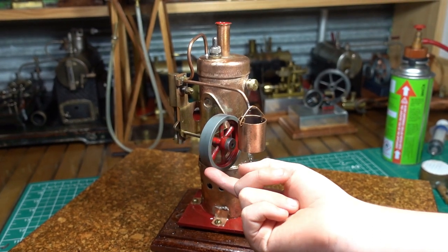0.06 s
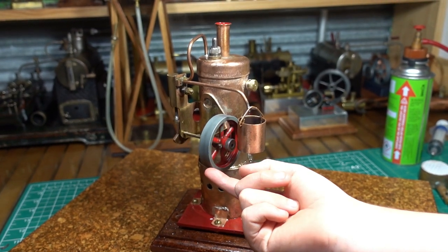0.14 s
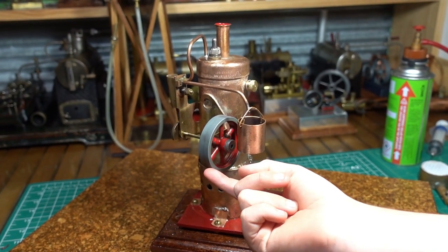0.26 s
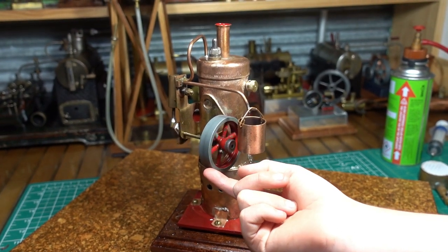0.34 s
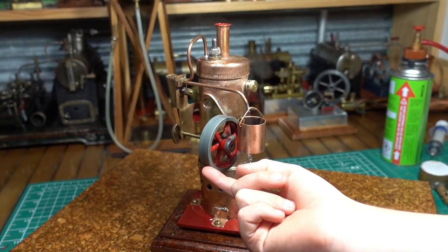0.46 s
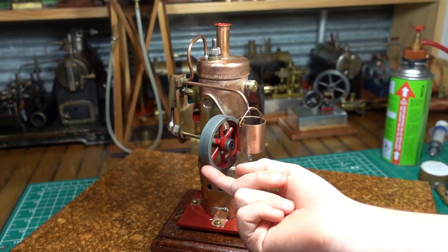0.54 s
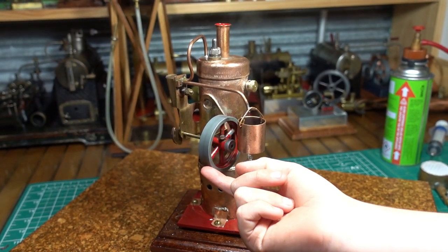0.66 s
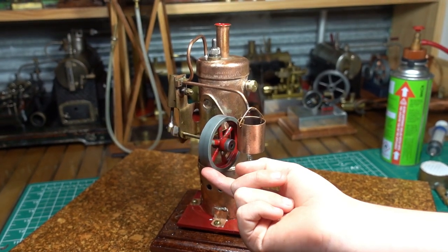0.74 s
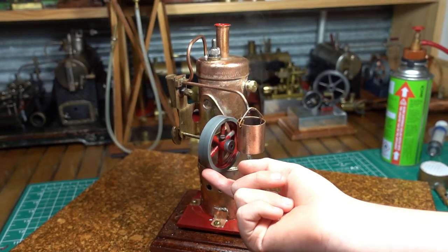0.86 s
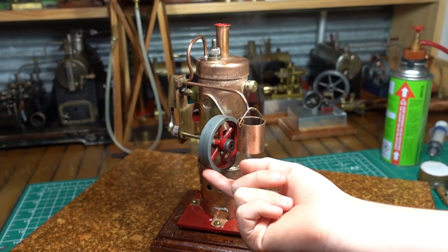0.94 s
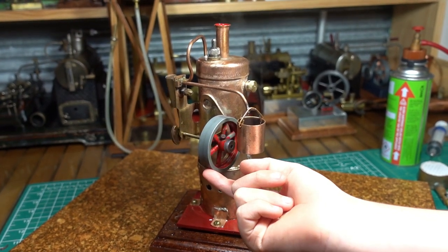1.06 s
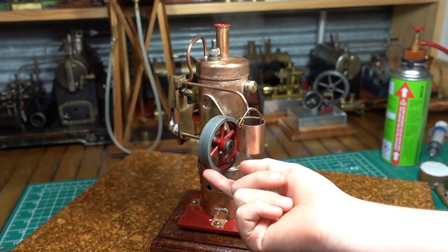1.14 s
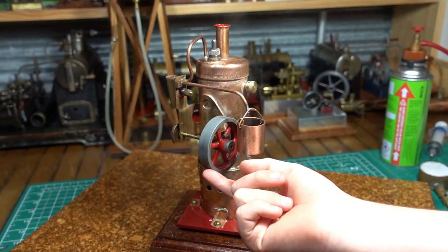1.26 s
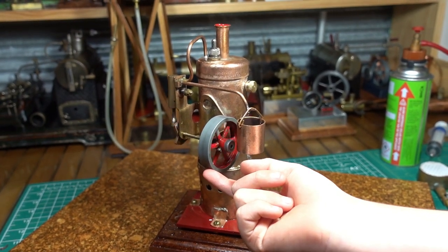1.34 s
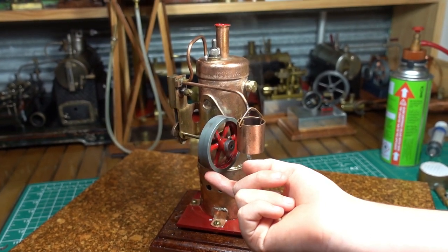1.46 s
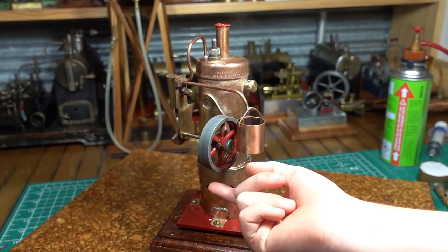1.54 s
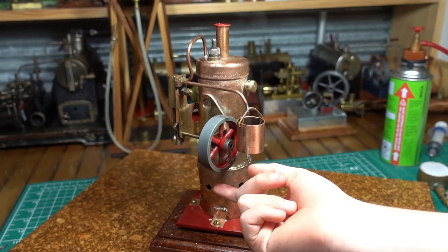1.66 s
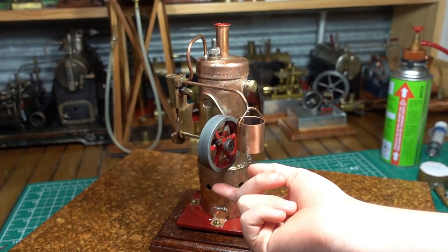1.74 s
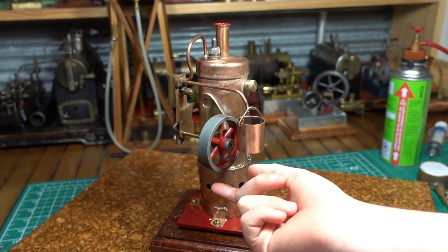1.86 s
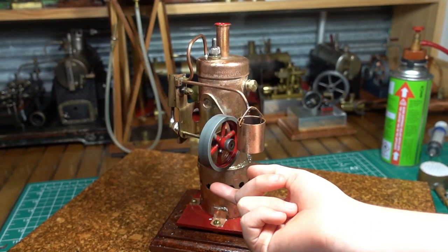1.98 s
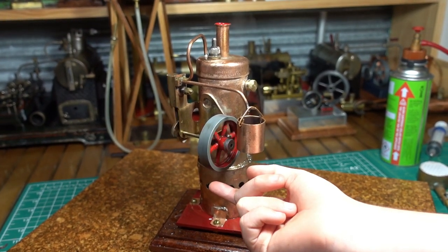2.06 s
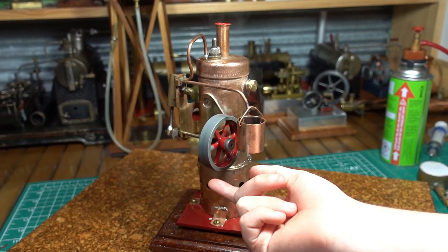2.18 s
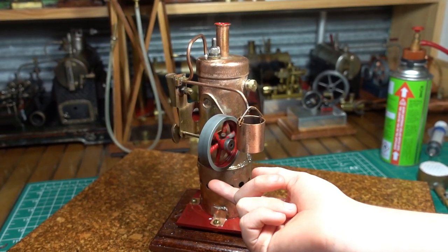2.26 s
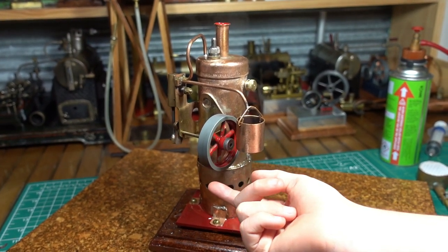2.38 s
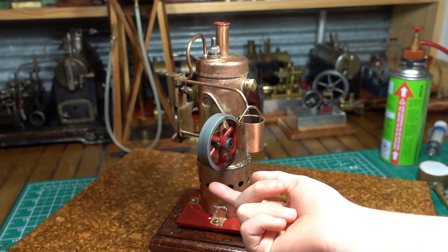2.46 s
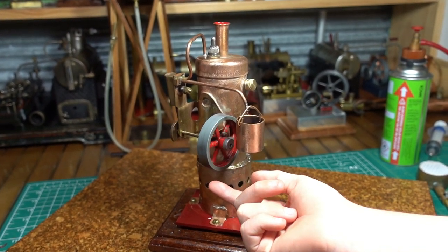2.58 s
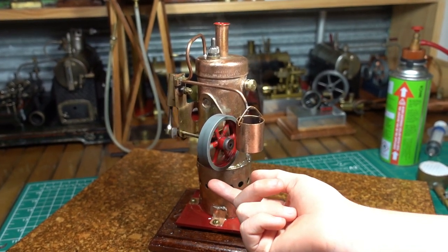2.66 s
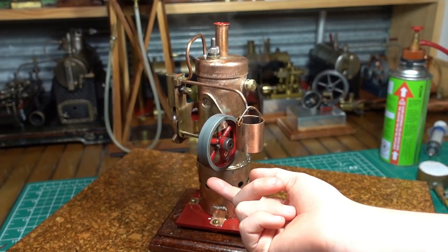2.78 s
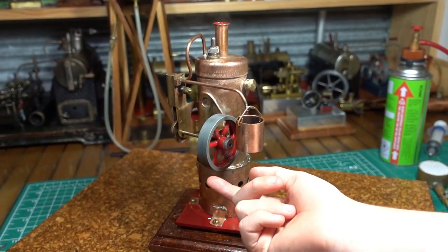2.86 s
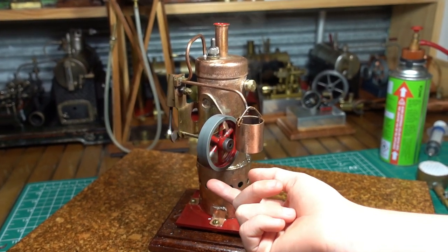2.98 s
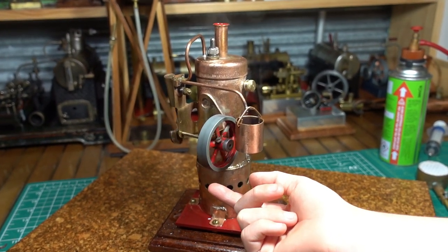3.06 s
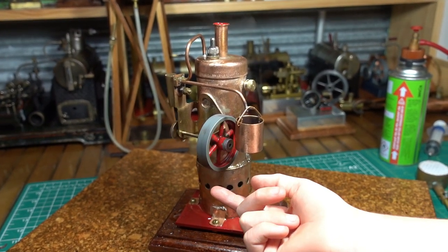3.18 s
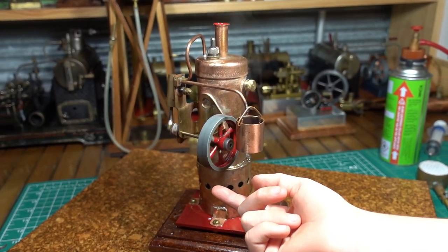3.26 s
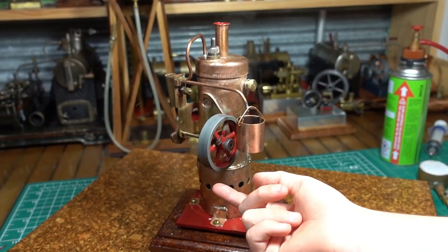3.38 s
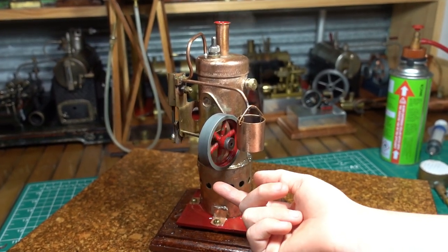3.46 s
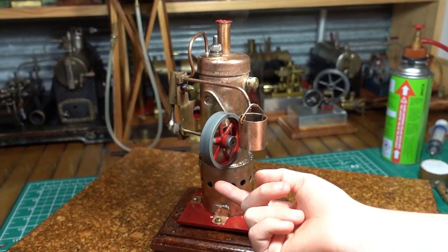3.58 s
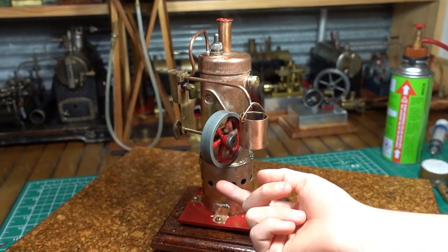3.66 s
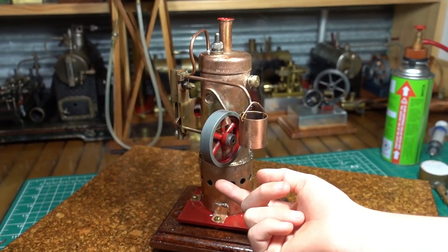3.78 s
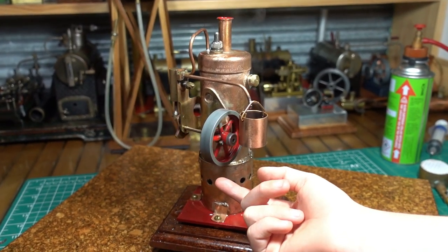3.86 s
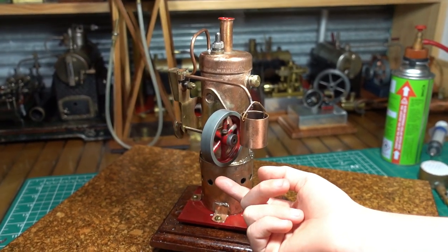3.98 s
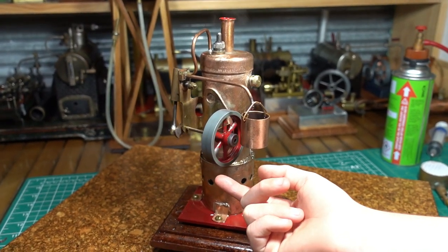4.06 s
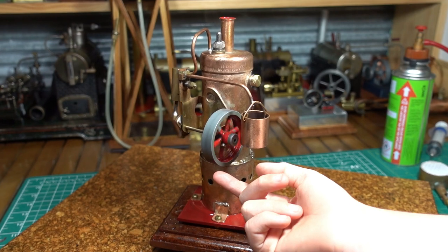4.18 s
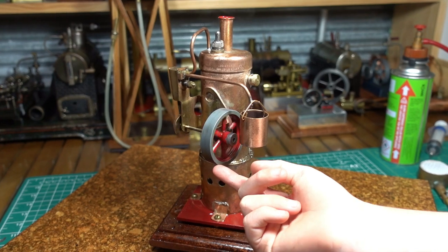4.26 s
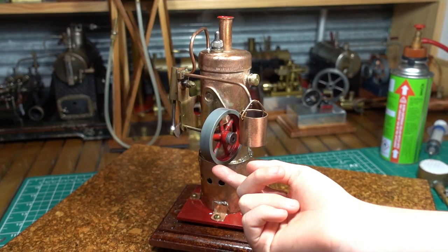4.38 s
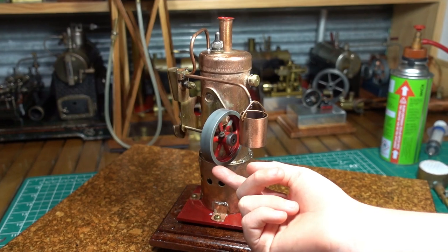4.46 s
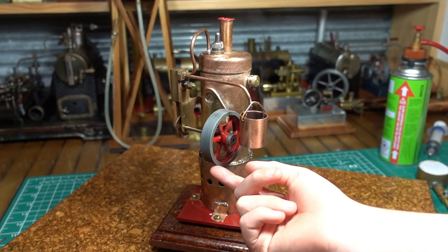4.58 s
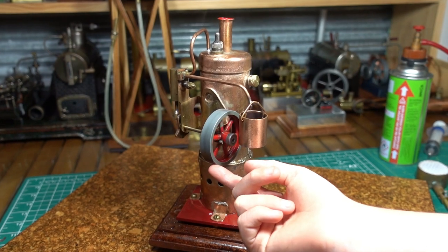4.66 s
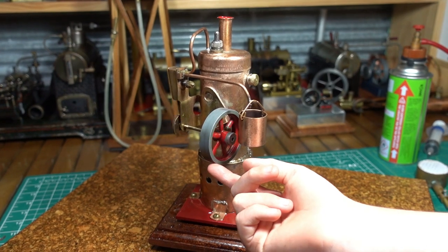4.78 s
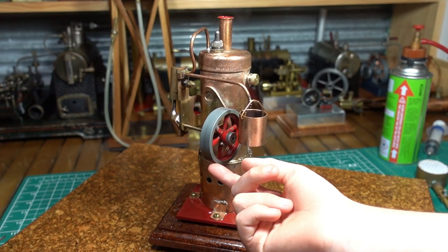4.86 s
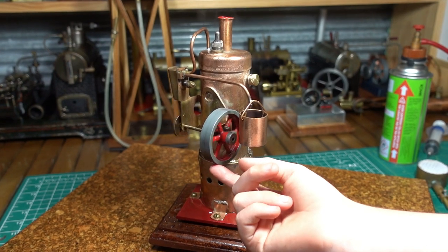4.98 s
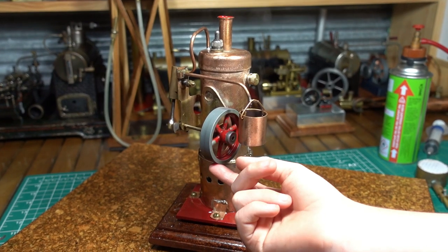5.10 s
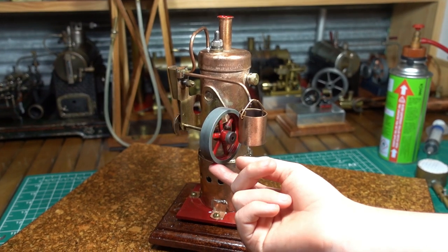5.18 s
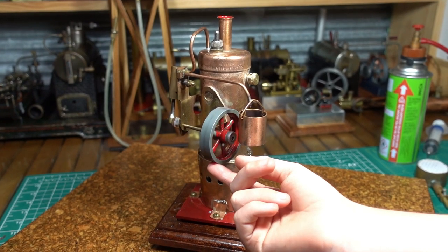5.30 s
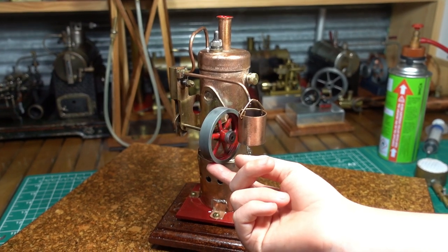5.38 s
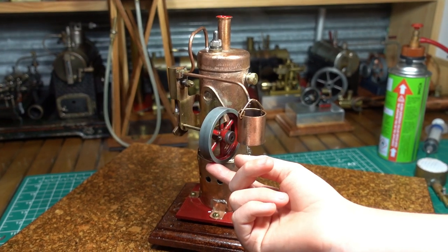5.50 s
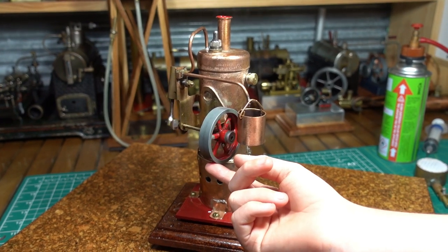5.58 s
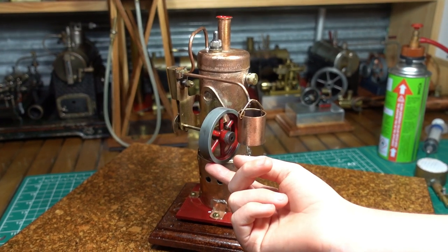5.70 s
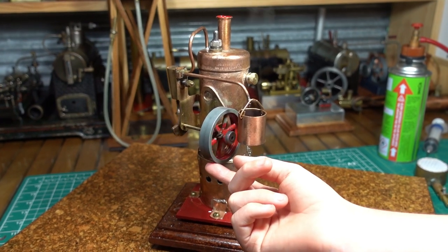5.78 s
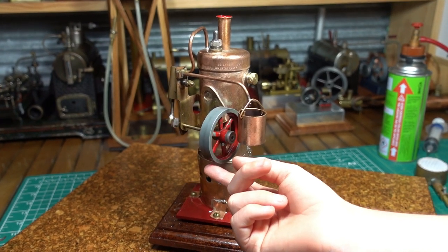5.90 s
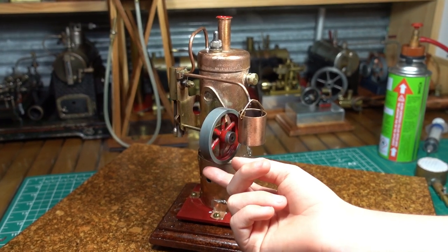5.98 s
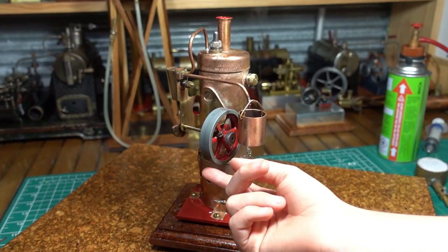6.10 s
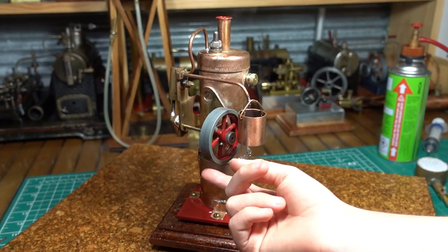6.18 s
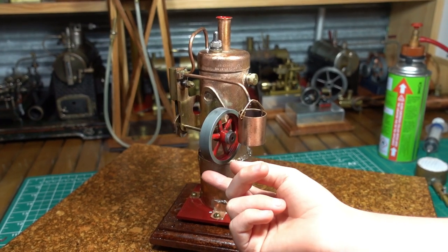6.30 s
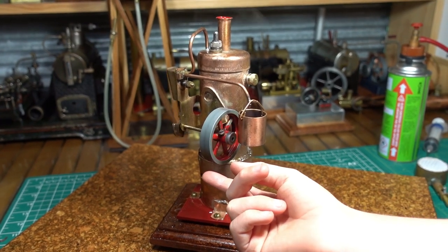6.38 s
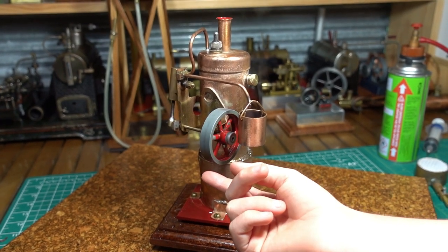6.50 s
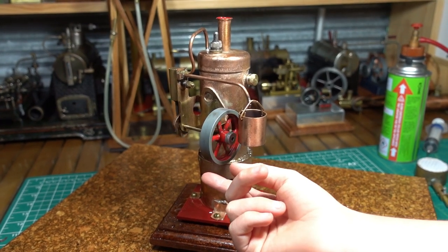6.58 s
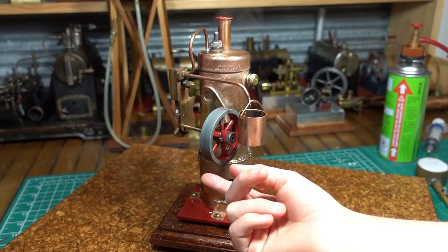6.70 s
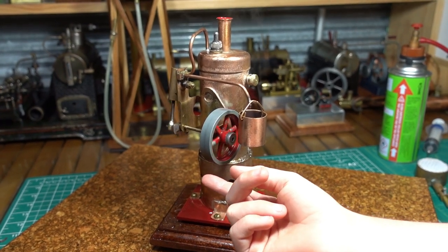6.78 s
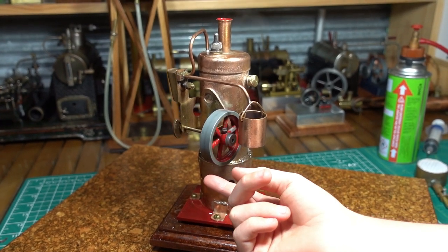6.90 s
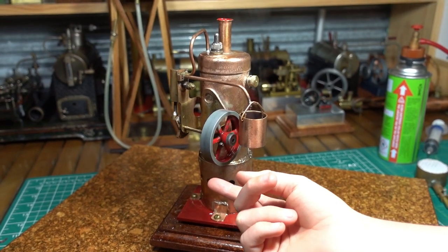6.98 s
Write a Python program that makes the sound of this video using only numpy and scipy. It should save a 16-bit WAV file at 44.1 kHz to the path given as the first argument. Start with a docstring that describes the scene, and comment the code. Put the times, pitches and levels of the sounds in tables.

```python
"""On a workbench in a small workshop, a little vertical steam engine turns three to six times a second, up close.
In every turn its linkage knocks lightly, then rattles and clacks hard: noisy bursts ring the modes of the metalwork.
A soft puff of steam and a wet spit from the exhaust follow, each a noise burst through its own resonances.
Filtered noise makes the burner's even hiss and the flue's hum, which comes and goes;
decaying noise tails make the workshop echo."""
import sys
import numpy as np
from scipy import signal
from scipy.fft import rfft, irfft
from scipy.io import wavfile
from scipy.ndimage import uniform_filter1d

SR = 44100
rng = np.random.default_rng(int(sys.argv[2]) if len(sys.argv) > 2 else 0)


def master_out(mix):
    """Clip the mix to full scale and print it as 16-bit PCM to the path in sys.argv[1]."""
    frames = np.transpose(np.atleast_2d(mix))
    ceiling = np.clip(frames, -1, 1)
    pcm = np.round(ceiling * 32767).astype(np.int16)
    wavfile.write(sys.argv[1], SR, pcm)


N = 310596  # length [samples]
SIZE = 8192  # length of one short sound [samples]
HZ, AGE = np.fft.rfftfreq(SIZE, 1 / SR), np.arange(SIZE) / SR  # its frequencies [Hz] and times [s]


def from_db(db):
    """Decibels to gain."""
    return 10 ** (np.asarray(db) / 20)


def read(points, hz):
    """A table's value at hz, on a log-frequency axis."""
    f, value = np.transpose(points)
    return np.interp(np.log(hz + 1), np.log(f), value)


def evened(x):
    """Scales x to rms 1."""
    return x / np.sqrt(np.mean(x ** 2) + 1e-20)


def add(mix, s, sound):
    """Mixes a stereo sound in at time s."""
    part = mix[:, max(round(s * SR), 0):][:, :SIZE]
    part += sound[:, :part.shape[1]]


# likeness of the two channels: (frequency [Hz], likeness [0-1])
CHANNEL_LIKENESS = [(170, 1), (600, 0.91), (1500, 0.87), (2700, 0.82), (5000, 0.4), (9000, 0.51),
                    (14000, 0.5)]


def noise(size):
    """White stereo noise whose channels are alike in the bass and part in the treble."""
    mid, side = rfft(rng.standard_normal((2, size)))
    same = np.clip(read(CHANNEL_LIKENESS, np.fft.rfftfreq(size, 1 / SR)), 0, 1)
    mid = mid * np.sqrt((1 + same) / 2)
    side = side * np.sqrt((1 - same) / 2)
    return irfft([mid + side, mid - side], size)


def resonances(modes, hz):
    """Gain at hz of a set of modes (Hz, width Hz, dB), whose powers add."""
    power = sum(from_db(db) ** 2 / (1 + (2 * (hz - f) / width) ** 2) for f, width, db in modes)
    return np.sqrt(power)


def causal(gain):
    """The minimum-phase response with this gain, which rings only after it is struck."""
    log_gain = np.log(np.maximum(gain, 1e-5))
    mirrored = np.r_[log_gain, log_gain[-2:0:-1]]
    return np.exp(np.conj(signal.hilbert(mirrored)))[:len(gain)]


def burst(rise, fall, grit_db, linger, linger_s, rebound=0):
    """Spectrum of a gritty noise burst that swells, dies fast, lingers and may bounce; its timing varies."""
    rise, fall = np.array([rise, fall]) * np.exp(.15 * rng.standard_normal(2))
    main_fall = np.exp(-(np.maximum(AGE - rise, 0) / fall) ** 2)
    chatter = linger * np.exp(-AGE / linger_s)
    shape = np.minimum(AGE / rise, 1) * (main_fall + chatter)
    # four bounces at random moments, weaker the later they come
    for at in rng.uniform(.012, .06, size=4):
        shape += rebound * np.exp(-at / 0.019 - ((AGE - at) / 0.0022) ** 2)
    flutter = evened(uniform_filter1d(rng.standard_normal(SIZE), size=64))
    grit = from_db(grit_db * np.tanh(flutter))
    return rfft(noise(SIZE) * shape * grit)


def hit(spectrum):
    """A short sound from its spectrum, with the energy of 15 ms at rms 1."""
    return evened(irfft(spectrum)) * np.sqrt(.015 * SR / SIZE)


# relative colour of the burner and steam leak's even hiss: (frequency [Hz], level [dB])
BURNER_COLOUR = [(25, -34), (60, -40), (110, -6), (170, -9.5), (240, 0), (450, -4.5), (700, 8),
                 (1000, -0.5), (2600, 7.5), (3800, -3), (5000, 4), (9000, -2.5), (15500, -8)]
# the flame's hollow notes in the flue: (frequency [Hz], width [Hz], relative level [dB])
FLUE_NOTES = [(154, 12, -3), (198.4, 6.1, 6)]
# the flame's hum as it comes and goes, before its level trim: (time [s], level [dB])
FLUE_SWELL = [(.3, -61.5), (1.3, -59.5), (1.8, -66), (2.4, -65), (3.2, -80), (4.8, -87.5), (5.7, -67),
              (7, -70)]


def burner(hiss_db=-53, flue_trim_db=-5.0):
    """Flame and leaking steam hiss evenly as coloured noise; the flue's resonant hum comes and goes."""
    hz = np.fft.rfftfreq(N, 1 / SR)
    hiss = evened(irfft(rfft(noise(N)) * from_db(read(BURNER_COLOUR, hz)), N))
    flue = resonances(FLUE_NOTES, hz) / (1 + (hz / 300) ** 4)
    hum = evened(irfft(rfft(noise(N)) * flue, N))
    hum_db = flue_trim_db + np.interp(np.arange(N) / SR, *np.transpose(FLUE_SWELL))
    return from_db(hiss_db) * hiss + from_db(hum_db) * hum


# the knock comes a quarter turn before the clack, less the time that the play takes to close [s]
KNOCK_LEAD_TURNS, PLAY_S = .25, .0138
# relative levels and random spread of the knock's two rings [dB]
KNOCK_BRIGHT_DB, KNOCK_LOW_DB, KNOCK_VARY_DB = -31.5, -33.5, 1.55


def knocks():
    """The soft knock about a quarter turn ahead of each clack, of nearly even force: rows like the clacks'."""
    s = clacks()[:, 0] - KNOCK_LEAD_TURNS * turn_lengths() + PLAY_S
    force = KNOCK_VARY_DB * rng.standard_normal(len(s))
    return np.transpose([s, KNOCK_BRIGHT_DB + force, KNOCK_LOW_DB + force])


# sharp modes of the metalwork, before damping and trim: (frequency [Hz], width [Hz], relative level [dB])
METAL_MODES = [(631, 20, -25.0), (892, 52, -23.7), (1172, 50, -18.6), (1745, 58, -21.5), (2113, 43, -16.6),
               (2301, 18, -16.5), (2428, 18, -2.6), (2495, 26, -6.2), (2660, 28, 0.9), (2801, 18, -11.3),
               (3036, 29, -19.3), (3282, 52, -12.5), (3795, 38, -12.1), (4535, 22, -4.3), (4672, 21, -4.0),
               (4844, 18, -9.5), (5012, 19, -6.3), (5266, 52, -17.1), (6207, 45, -9.6), (6375, 54, -15.1),
               (6842, 23, -11.4), (7065, 18, -19.6), (7229, 54, -11.5), (7525, 48, -4.7),
               (8224, 110, -12.4), (8599, 110, -10.4), (10244, 58, -14.0), (11135, 55, -13.4)]
# its many short-lived modes, taken together: (frequency [Hz], relative level [dB])
DENSE_MODES = [(40, -66), (150, -54), (400, -86), (900, -61), (2000, -25), (3500, -24), (5000, -10.5),
               (5800, -19), (7000, -13), (8700, -24.5), (9300, -26.5), (11500, -25), (13000, -31),
               (15700, -33.5)]


def metalwork(modes_db=-1, damping_hz=22, ripple_db=-0.7):
    """Gain of the engine's body: sharp modes, damped by its joints, over an uneven bed of dense ones."""
    ripple = ripple_db * evened(uniform_filter1d(rng.standard_normal(len(HZ)), size=14))
    damped = [(hz, width + damping_hz, db + modes_db) for hz, width, db in METAL_MODES]
    bed = from_db(read(DENSE_MODES, HZ) + ripple)
    return np.hypot(resonances(damped, HZ), bed)


def blows(rows, gain, rise, fall, linger, linger_s, bright_db, low_db, grit_db, lead, rebound=0,
          split_hz=3400, vary_db=1.72):
    """Metal meets metal; each blow lands differently and drives low and bright modes at separate levels."""
    out = np.zeros((2, N))
    low_share = 1 / (1 + (HZ / split_hz) ** 12)
    for s, bright, low in rows:
        # the modes shift slightly at random, standing in for the position of the moving parts
        body = np.interp(HZ * (1 + .005 * rng.standard_normal()), HZ, gain)
        landing = np.interp(HZ, np.linspace(0, SR / 2, 16), rng.standard_normal(16))
        contact = burst(rise, fall, grit_db, linger, linger_s, rebound) * from_db(vary_db * landing)
        bright_ring = hit(contact * causal(body * np.sqrt(1 - low_share)))
        low_ring = hit(contact * causal(body * np.sqrt(low_share)))
        add(out, s - lead, from_db(bright + bright_db) * bright_ring)
        add(out, s - lead, from_db(low + low_db) * low_ring)
    return out


# relative force spectrum of a light knock: (frequency [Hz], level [dB])
KNOCK_FORCE = [(30, -34), (200, -10), (600, 3.5), (850, 2), (1300, 12), (2500, 4.5), (5000, 5), (8000, 4),
               (13000, 4.5)]
# relative force spectrum of a hard clack: (frequency [Hz], level [dB])
CLACK_FORCE = [(30, -9), (100, -19), (300, -6.5), (630, -2), (1100, 3.5), (2500, 2), (5000, 2.5), (8000, 3),
               (14000, 5)]


def linkage(knock_rows):
    """Softer knocks, and hard clacks with their touches and jolts, ring the same metalwork."""
    body = metalwork()
    rattle = np.vstack([clacks(), touches(knock_rows[:, 0]), jolts()])
    hard = blows(rattle, body * from_db(read(CLACK_FORCE, HZ)),
                 rise=0.005, fall=0.0079, linger=0.69, linger_s=0.016,
                 bright_db=-1.58, low_db=-2.3, grit_db=3.5, lead=.0015, rebound=1.27)
    light = blows(knock_rows, body * from_db(read(KNOCK_FORCE, HZ)),
                  rise=0.0046, fall=0.0086, linger=0.75, linger_s=0.056,
                  bright_db=-3.5, low_db=-2.0, grit_db=1.5, lead=0.001456, rebound=0.48)
    return hard + light


def hollow_note(knock_times, hz=634, level_db=-43, swell=0.0074, t60=0.16):
    """Each knock also wakes one low, hollow mode of the boiler: a decaying sine, slightly varied."""
    out = np.zeros((2, N))
    for s, (a, b) in zip(knock_times, rng.uniform(-1, 1, (len(knock_times), 2))):
        detune, strength = 1 + .01 * a, 1 + .2 * b
        ring = np.sin(2 * np.pi * hz * detune * AGE) * (1 - np.exp(-(AGE / swell) ** 2))
        decay = from_db(level_db - 60 * AGE / t60)
        add(out, s, np.tile(strength * ring * decay, (2, 1)))
    return out


# workshop reverberation: (frequency [Hz], time to fall by 60 dB [s])
ROOM_DECAY = [(150, 0.31), (700, 0.42), (2600, 0.29), (5000, 0.31), (9000, 0.26), (15000, 0.4)]


def workshop(x, wet_db=-7, first_echo=0.0064):
    """Dense echoes from bench and shelves: three decaying noise tails take turns, so the echo keeps changing."""
    out, t = np.zeros((2, N)), np.arange(N) / SR
    for k in range(3):
        hz, age, z = signal.stft(noise(size=16384), SR, nperseg=256)
        decay = from_db(-60 * age / read(ROOM_DECAY, hz)[:, None])
        tail = signal.istft(z * decay, SR, nperseg=256)[1]
        # silent until the first echo, then fading in over as long again
        tail *= np.clip(np.arange(tail.shape[1]) / SR / first_echo - 1, 0, 1)
        turn = np.sqrt(2 / 3) * np.cos(2 * np.pi * (.7 * t + k / 3))
        out += signal.fftconvolve(x * turn, tail / np.linalg.norm(tail[0]), axes=1)[:, :N]
    return from_db(wet_db) * out


# the loose linkage touches at this share of the way from knock to clack; its low ring is weaker [dB]
TOUCH_SHARE, TOUCH_LOW_DB = 0.66, -4.5


def touches(knock_times):
    """The touch between each knock and its clack, mostly light, sometimes hard: rows like the clacks'."""
    clack, _, _, force, _ = np.transpose(TURNS)
    s = knock_times + TOUCH_SHARE * (clack - knock_times)
    return np.transpose([s, force, force + TOUCH_LOW_DB])


# turns of the flywheel, timed by their clack; levels are relative, before each sound's trim:
# (time [s], bright ring [dB], low ring [dB], touch before the clack [dB], spit of water [dB])
TURNS = [(0.057, -17, -22.5, -47, -38.5), (0.226, -19.7, -28, -41, -41), (0.407, -20.5, -24, -45, -35.5),
         (0.595, -17.5, -24, -31, -50), (0.788, -19.5, -25.5, -35.5, -38),
         (0.991, -18.5, -22, -33.5, -43.5), (1.199, -18.5, -25, -31, -60), (1.423, -17, -26, -62, -62),
         (1.646, -18, -23.5, -38, -42.5), (1.852, -15.5, -22.5, -52, -36), (2.039, -18, -22.5, -52, -36),
         (2.214, -20, -28.5, -39, -37.5), (2.385, -18, -23.5, -32, -43), (2.547, -17, -24.5, -34, -36),
         (2.708, -19.5, -25, -26.5, -42), (2.858, -18, -22, -50, -34.5), (3.01, -19, -26, -18, -41),
         (3.164, -22, -21, -23.5, -35.5), (3.318, -20.5, -21.5, -28, -52), (3.473, -19, -23, -28, -41),
         (3.626, -22.5, -27.5, -29, -34), (3.784, -19.5, -24, -28.5, -37.5), (3.937, -21.5, -27, -29, -41),
         (4.091, -21.5, -25.5, -42, -54), (4.245, -19, -22.5, -26.5, -39.5), (4.4, -18, -24.5, -25, -35.5),
         (4.57, -17.5, -21.5, -26.5, -36.5), (4.743, -18, -24, -30.5, -33),
         (4.927, -17, -28.5, -22.5, -36.5), (5.126, -23.5, -27, -21, -32.5), (5.345, -18, -20, -24.5, -37),
         (5.607, -20, -27.5, -33.5, -37), (5.927, -19, -24.5, -55, -34), (6.24, -19.5, -29.5, -38, -36),
         (6.53, -18.5, -25.5, -35, -33), (6.799, -19, -25.5, -33, -36.5), (7.06, -19, -27, -32, -41)]


def clacks():
    """The hard clack of every turn: rows (time s, bright ring dB, low ring dB)."""
    return np.array(TURNS)[:, :3]


def turn_lengths():
    """Seconds that each turn of the flywheel takes, from the spacing of the clacks."""
    return np.gradient(np.transpose(TURNS)[0])


# relative colour of the steam puff: (frequency [Hz], level [dB])
PUFF_COLOUR = [(30, -24), (80, -10), (160, -23), (520, -31), (900, -5.5), (1400, 11), (2500, 12),
               (7000, -1.5), (15000, 0)]
# hollow resonances that the steam puff wakes: (frequency [Hz], width [Hz], relative level [dB])
CHIMNEY_MODES = [(150, 19, -2), (299, 23, 9), (400, 14, 8.5), (850, 97, 12.5), (1197, 47, 12)]


def puffs(level_db=-37, delay=0.0092):
    """A soft noise burst of spent steam follows each clack and resounds in the chimney."""
    out = np.zeros((2, N))
    colour = causal(np.hypot(from_db(read(PUFF_COLOUR, HZ)), resonances(CHIMNEY_MODES, HZ)))
    for s in clacks()[:, 0]:
        steam = burst(rise=0.0071, fall=0.032, grit_db=2.0, linger=.15, linger_s=0.029)
        add(out, s + delay, from_db(level_db) * hit(steam * colour))
    return out


# the linkage settles this share of a turn after the clack; ring levels against the clack's, and spread [dB]
JOLT_LAG_TURNS, JOLT_BRIGHT_DB, JOLT_LOW_DB, JOLT_VARY_DB = .21, -27.5, -16, 3


def jolts():
    """The faint, uneven jolt after each clack: rows like the clacks'."""
    s, bright, low = clacks().T
    chance = JOLT_VARY_DB * rng.standard_normal(len(s))
    s = s + JOLT_LAG_TURNS * turn_lengths()
    return np.transpose([s, bright + JOLT_BRIGHT_DB + chance, low + JOLT_LOW_DB + chance])


# the spit trails the clack by a share of the turn plus the way through the pipe [s]
SPIT_LAG_TURNS, PIPE_S = .37, 0.0052
# relative colour of the spit's gurgle: (frequency [Hz], level [dB])
GURGLE_COLOUR = [(100, -43), (400, -31), (750, -21), (1100, -1.5), (1500, -3), (2100, 1.5), (2800, 12.5),
                 (3800, -20), (6000, -7.5), (8800, 2.5), (11000, -10), (15000, -14.5)]


def spits(chirp_hz=3100, chirp_width_hz=300, gurgle_db=-0.5, chirp_db=-3.8, vary_db=0.5):
    """Condensed water bursts from the exhaust: two short resonances that differ from spit to spit."""
    out = np.zeros((2, N))
    chances = rng.standard_normal((len(TURNS), 3))
    for (clack, *_, water_db), length, (a, b, c) in zip(TURNS, turn_lengths(), chances):
        s = clack + SPIT_LAG_TURNS * length + PIPE_S
        splash = burst(rise=0.004, fall=0.0099, grit_db=6, linger=0.077, linger_s=.01)
        cavity = 1 + 1.26 / (1 + ((HZ - 1480 * np.exp(0.053 * a)) / 220) ** 2)
        pipe = 1 / (1 + (2 * (HZ - chirp_hz * np.exp(0.012 * b)) / chirp_width_hz) ** 2)
        gurgle = hit(splash * causal(cavity * from_db(read(GURGLE_COLOUR, HZ))))
        chirp = hit(splash * causal(pipe))
        # when the gurgle gains, the chirp loses
        add(out, s, from_db(water_db + gurgle_db + vary_db * c) * gurgle)
        add(out, s, from_db(water_db + chirp_db - vary_db * c) * chirp)
    return out


# how much louder the left channel is than the right: (frequency [Hz], level [dB])
LEFT_TILT = [(200, 0), (700, -1), (1170, 1), (2700, 0.5), (6400, .5), (9800, 1), (14000, -1)]


def scene():
    """The engine in its room, with the burner, balanced between left and right."""
    knock_rows = knocks()
    engine = linkage(knock_rows) + hollow_note(knock_rows[:, 0]) + spits() + puffs()
    mix = engine + workshop(engine) + burner()
    left_db = read(LEFT_TILT, np.fft.rfftfreq(N, 1 / SR))
    return irfft(rfft(mix) * from_db([left_db / 2, -left_db / 2]), N)


def record(dry, edge_hz=15800):
    """A high-pass sheds the deepest bass and a steep low-pass closes the top of the band."""
    thinned = signal.sosfilt(signal.butter(2, 45, "highpass", fs=SR, output="sos"), dry)
    lowpass = signal.firwin(401, edge_hz, window=("kaiser", 8), fs=SR)
    return signal.oaconvolve(thinned, lowpass[None], "same")


dry = scene()
out = record(dry)
master_out(out)
```